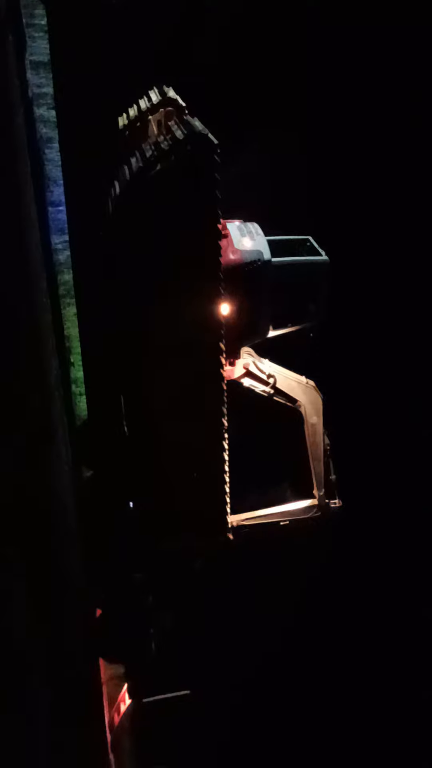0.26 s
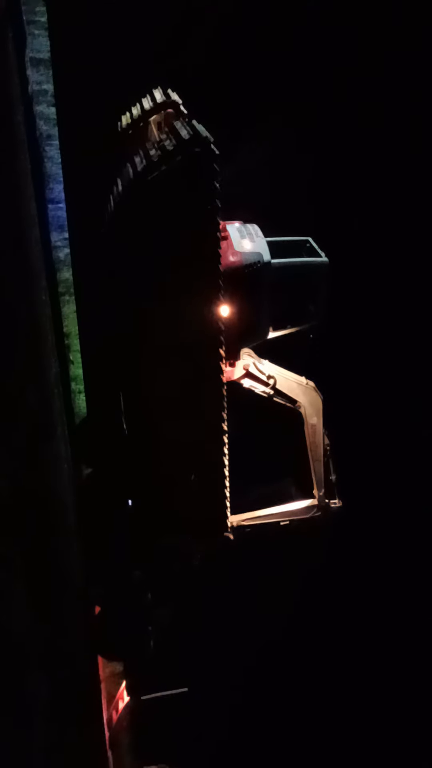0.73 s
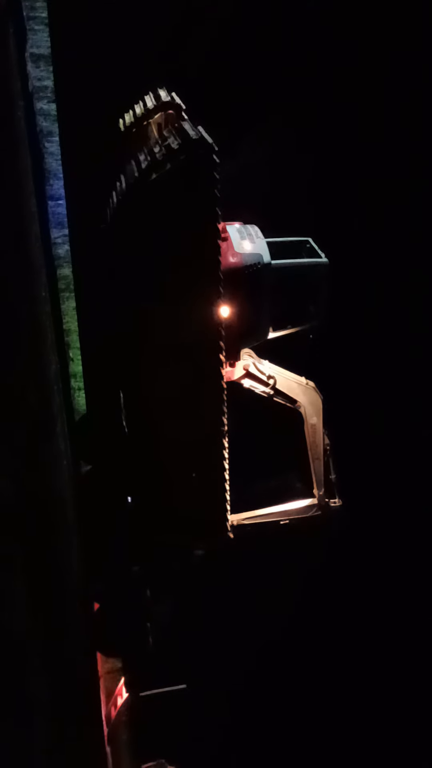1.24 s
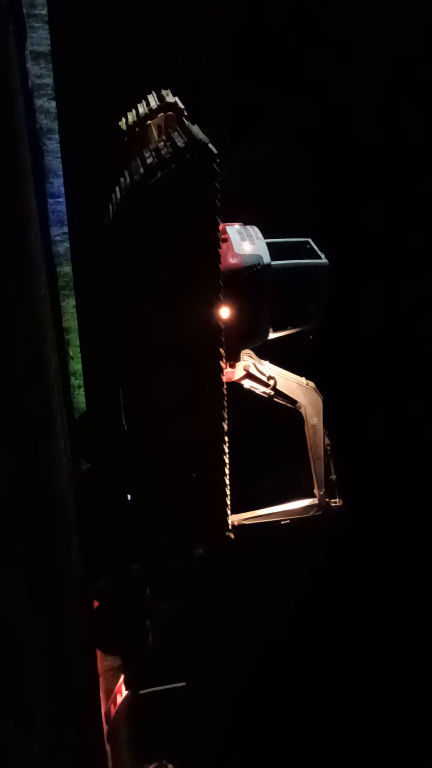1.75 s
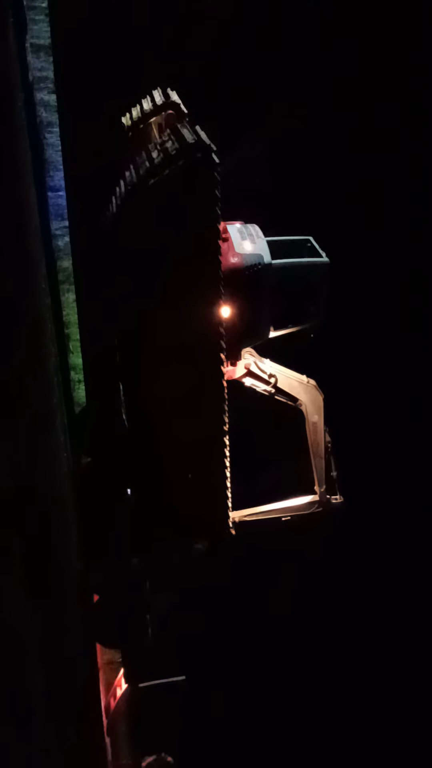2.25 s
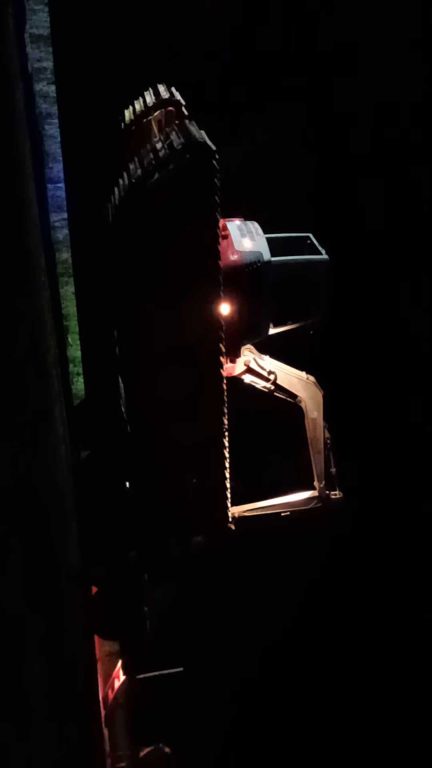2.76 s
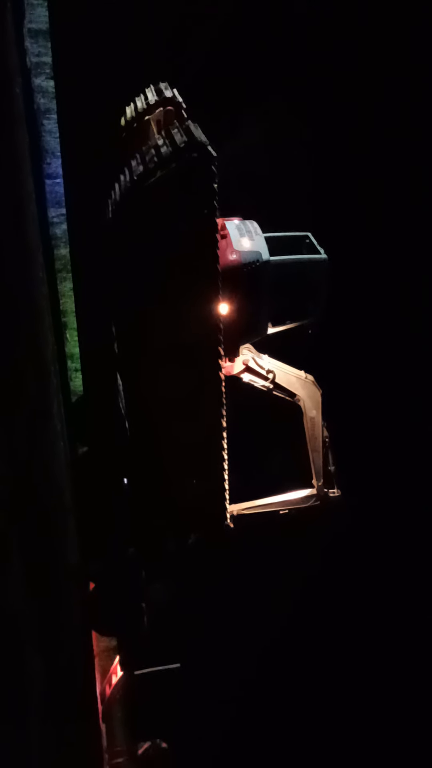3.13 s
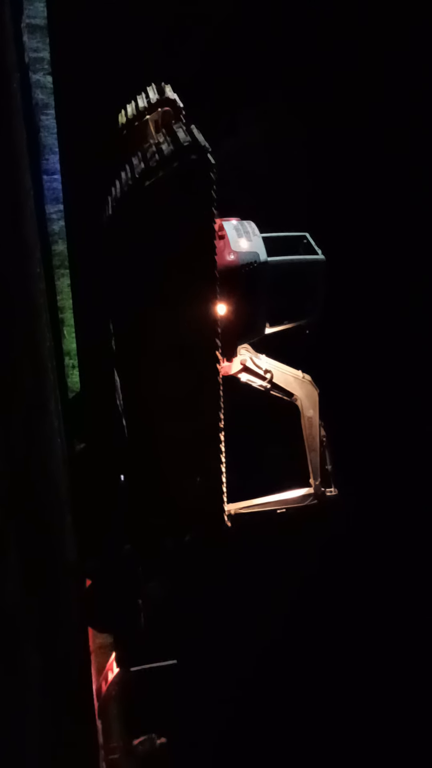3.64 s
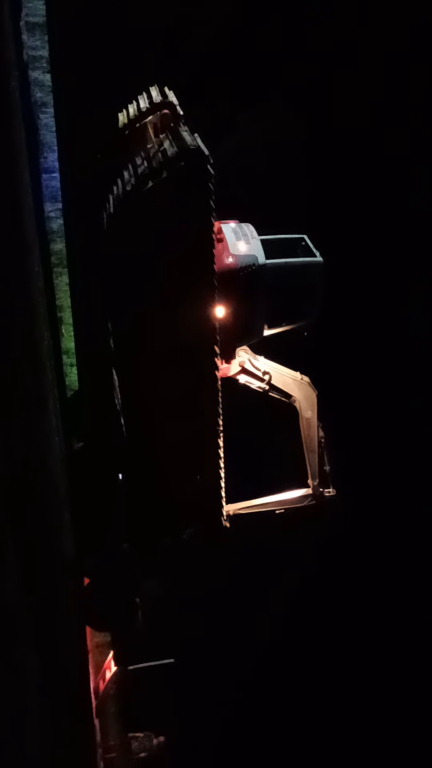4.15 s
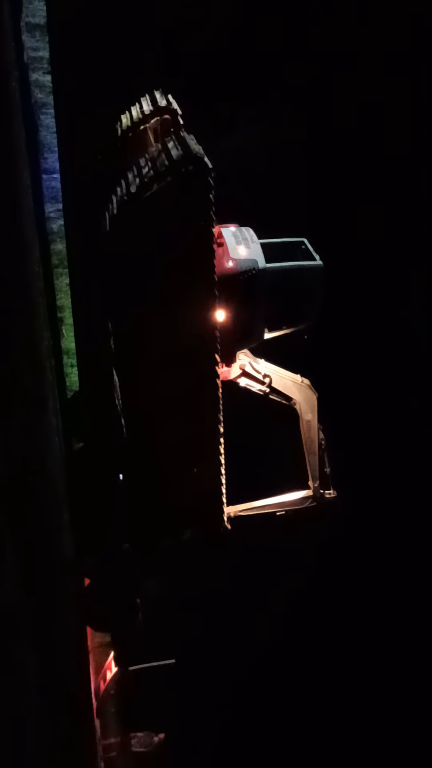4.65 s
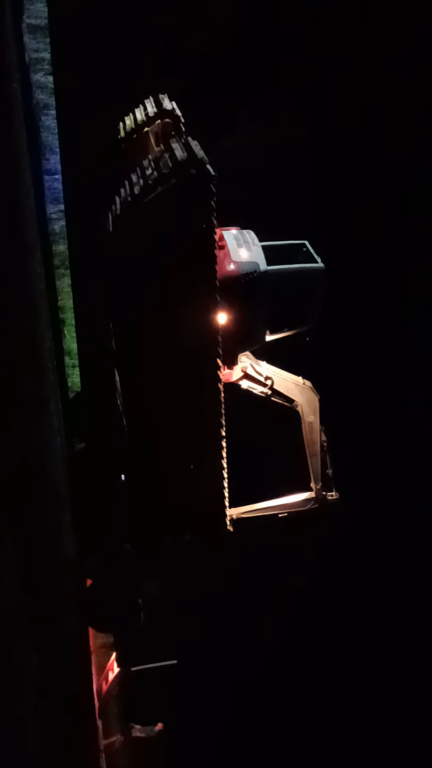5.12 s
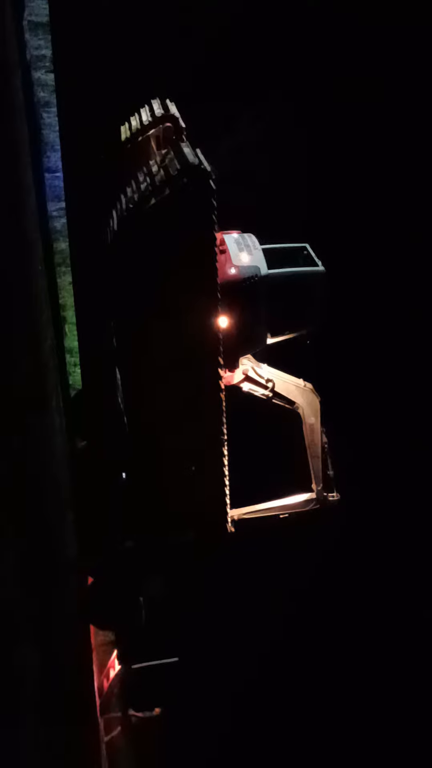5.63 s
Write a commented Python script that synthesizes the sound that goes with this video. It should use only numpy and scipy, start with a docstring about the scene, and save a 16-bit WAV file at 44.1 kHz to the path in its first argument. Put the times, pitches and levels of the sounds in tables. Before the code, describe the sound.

A heavy excavator diesel idles outdoors at an unchanging speed throughout: a low, buzzing exhaust drone, thick rumble and fast, dry injector clatter over an even fan rush, stronger on the left. Very close to the stereo microphone, loose steel bodywork knocks. At about 0.06 s a tiny metallic chirp comes with a booming knock, then lighter taps at 0.1 and 0.2 s. At 1.25 s a knock leads into a short, raspy, high squeal lasting under a fifth of a second, with a clank at 1.4 s. The loudest cluster bangs from 1.7 to 1.85 s, with tinny buzzing and hollow booms, and low panels shudder afterwards. A hard clank comes at 2.5 s. Faint soft hisses puff near 2.2, 3.0, 3.8 and 4.7 s. Knocks return at 4.95 and 5.03 s, then 5.54 s. Dull short echoes follow the blows; the level ducks after the heaviest and slowly recovers.

```python
"""Outdoors, beside steel bodywork, with an excavator's diesel idling.
The exhaust is a stack of tones locked to the crank; rumble and injection clatter are pulsed noise.
Close by, loose metal knocks, booms, chirps, buzzes and squeals once, over faint puffs of hiss: noise
bursts drive resonances, and echoes follow. The microphone's gain control ducks everything after the
loudest blows."""
import sys
import numpy as np
from scipy import signal
from scipy.fft import rfft, irfft, next_fast_len
from scipy.io import wavfile
from scipy.ndimage import uniform_filter1d, minimum_filter1d

SR = 44100
rng = np.random.default_rng(int(sys.argv[2]) if len(sys.argv) > 2 else 0)


def store_wav(level_fs):
    """Save 16-bit WAV to argv[1]."""
    pcm = np.round(np.clip(np.atleast_2d(level_fs), -1, 1) * 32767)
    wavfile.write(sys.argv[1], SR, pcm.T.astype(np.int16))


N = 259740
TIME = np.arange(N) / SR


def from_db(db):
    """Decibels to gain."""
    return 10 ** (np.asarray(db) / 20)


def rms_one(x):
    """Scale to unit power."""
    return x / np.sqrt(np.mean(x ** 2) + 1e-20)


def at_hz(points, hz):
    """Read a spectrum on a log-frequency axis."""
    f, value = np.transpose(points)
    return np.interp(np.log(np.maximum(hz, 1)), np.log(f), value)


def drift(rate):
    """Smooth chance with spread 1 that changes about rate times a second."""
    # drawn at a fortieth of the sample rate; the first 2000 values let the filter settle
    r = np.exp(-80 * np.pi * rate / SR)
    noise = rng.standard_normal(N // 40 + 2002)
    slow = signal.lfilter([1], [1, -2 * r, r * r], noise)[2000:]
    return np.interp(np.arange(N) / 40, np.arange(len(slow)), rms_one(slow))


def colour(x, spectrum, tilt_db=0):
    """Causal (minimum-phase) filter with the given spectrum; white noise keeps its power."""
    size = 2 * next_fast_len(x.shape[-1] // 2 + 2048)
    hz = np.fft.rfftfreq(size, 1 / SR)
    gain = from_db(at_hz(spectrum, hz) + tilt_db * np.log2(hz + 1))
    gain = rms_one(gain / (1 + (hz / (2 * spectrum[-1][0])) ** 2))
    # folding the cepstrum forward in time gives the minimum phase
    cepstrum = irfft(np.log(gain))
    cepstrum[1:size // 2] *= 2
    cepstrum[size // 2 + 1:] = 0
    return irfft(rfft(x, size) * np.exp(rfft(cepstrum)))[..., :x.shape[-1]]


def resonate(x, hz, width_hz):
    """A resonance that keeps the power of white noise."""
    r = np.exp(-np.pi * width_hz / SR)
    zeros = np.sqrt((1 - r * r) / 2) * np.array([1, 0, -1])
    poles = [1, -2 * r * np.cos(2 * np.pi * hz / SR), r * r]
    return signal.lfilter(zeros, poles, x + 1e-18)


def swell(t, hold, t60, rise=0.00037):
    """Quick rise, a hold, then an exponential decay."""
    return (1 - np.exp(-np.maximum(t, 0) / rise)) * from_db(-60 * np.maximum(t - hold, 0) / t60)


def strokes(phase, sharpness):
    """One burst a cycle, falling exponentially until the next; unit power."""
    return rms_one(np.exp(-sharpness * (phase % 1)))


def add(out, s, sound):
    """Mix a sound in at its time."""
    at = round(max(s, 0) * SR)
    out[..., at:at + sound.shape[-1]] += sound[..., :N - at]


def stereo(pair, likeness, balance):
    """Mix two unrelated signals to left and right; the phone's body shades the right port."""
    size = next_fast_len(N, True)
    hz = np.fft.rfftfreq(size, 1 / SR)
    mid, side = rfft(pair, size)
    alike = np.clip(at_hz(likeness, hz), -1, 1)
    sign = np.array([[1], [-1]])
    ports = from_db(sign * at_hz(balance, hz) / 2)
    ports /= np.sqrt(np.mean(ports ** 2, axis=0))
    mixed = np.sqrt((1 + alike) / 2) * mid + sign * np.sqrt((1 - alike) / 2) * side
    return irfft(ports * mixed, size)[:, :N]


# The crankshaft at idle. Each row: time in seconds, speed in turns per second.
CRANK_SPEED = [(0, 36.9), (1.2, 36.85), (2.1, 36.85), (2.8, 37.0), (5.5, 37.0), (5.89, 36.8)]
# The exhaust note. Each row: multiple of the crank rate, level in dB.
EXHAUST_ORDERS = [(2, -28.5), (4, -25), (5, -29.5), (6, -29.5), (9, -43.5), (10, -39.5), (12, -57),
                  (15, -46), (17, -54.5), (20, -52)]
# Colours of the low rumble and of the clatter. Each row: frequency in Hz, relative level in dB per Hz.
RUMBLE_COLOUR = [(20, -16), (40, -15), (60, -2), (85, -7), (103, 2), (122, 5), (190, 4.5), (260, 1.5),
                 (345, 2), (410, -10.5), (520, -18.5), (800, -32.5)]
CLATTER_COLOUR = [(380, -7.5), (500, -2), (680, -5), (1100, -9.5), (1290, -6.5), (1460, -9), (1820, -4.5),
                  (2200, -14.5), (2900, -21.5), (3150, -27), (5400, -34.5), (6600, -47.5), (9800, -26.5),
                  (13100, -42.5), (14600, -40)]
# How alike the engine is at the two ports. Each row: frequency in Hz, likeness (held within -1 to 1).
ENGINE_LIKENESS = [(60, 2.5), (150, 0), (300, 0.37), (600, -0.12), (14000, 0)]
# How far the engine leans to the left port. Each row: frequency in Hz, left minus right in dB.
ENGINE_BALANCE = [(60, 1), (150, 2), (300, 7.4), (600, 7), (1400, 10.6), (2600, 12.6), (5000, 9.4),
                  (6600, 10), (8000, 16), (10000, 67), (12500, 15), (15000, 10)]
# a tapping at its own steady rate; TAP_START is the part of a cycle already run at the start
TAPS_PER_S, TAP_START = 29.996, .12
# every second tap is weaker
TAP_ALTERNATION_DB = 1.5


def engine(waver=.1, start_turn=.55, throb=0.09, tap_sharpness=2.17):
    """Exhaust orders pile up once a turn; rumble swells with them and injection ticks three times."""
    turns = np.cumsum(np.interp(TIME, *np.transpose(CRANK_SPEED))) / SR + start_turn
    note = np.zeros(N)
    for order, db in EXHAUST_ORDERS:
        strength = np.sqrt(2) * from_db(db) * (1 + waver * drift(6.5))
        note -= strength * np.cos(2 * np.pi * order * turns + waver * drift(1.9))
    pulsed = rng.standard_normal((2, N)) * (1 + throb * np.cos(2 * np.pi * turns))
    rumble = from_db(-26.5) * colour(pulsed, RUMBLE_COLOUR)
    # injector ticks, whose strength wanders
    ticks = .36 * strokes(3 * turns, 3.0) * from_db(1.5 * drift(40))
    # a slower tapping lies beneath them
    beat = TAPS_PER_S * TIME + TAP_START
    tap_db = 1.26 * drift(50) - TAP_ALTERNATION_DB * (np.floor(beat) % 2)
    taps = 0.7 * strokes(beat, tap_sharpness) * from_db(tap_db)
    # the constant .5 is the even rush of the fan
    force = rms_one(np.sqrt(ticks ** 2 + taps ** 2 + .5))
    clatter = from_db(-31.5) * colour(rng.standard_normal((2, N)) * force, CLATTER_COLOUR)
    hissing = rumble + clatter + puffs()
    # the note is a little louder on the left
    return note * from_db([[.7], [-.7]]) + stereo(hissing, ENGINE_LIKENESS, ENGINE_BALANCE)


# A small steel part's modes. Each row: frequency in Hz, relative level in dB, 60 dB decay in seconds.
CHIRP_MODES = [(1934, -14.5, 0.065), (2002, -15.5, 0.042), (3080, -39, 0.06), (3967, -25, 0.033),
               (4290, -37, 0.073)]


def chirp(start=.058, hold=0.01):
    """A brief slip sets a small steel part ringing."""
    t = TIME - start
    return sum(from_db(db) * swell(t, hold, t60, rise=0.00082) * np.sin(2 * np.pi * hz * (t - hold))
               for hz, db, t60 in CHIRP_MODES)


def rattle(t, swing_hz, contacts_per_s=1100, smooth=0.28, slap=0.086):
    """Loose parts slap against a panel on every swing; unit power."""
    touching = rng.random((2, len(t))) < contacts_per_s / SR
    contacts = touching * rng.choice([-1, 1], (2, len(t)))
    grit = rms_one(contacts) + smooth * rng.standard_normal((2, len(t)))
    return rms_one(grit * strokes(swing_hz * t, slap))


# Colours of a blow's thud and clank. Each row: frequency in Hz, relative level in dB per Hz.
THUD_COLOUR = [(90, -33.5), (160, -0.5), (240, 4.5), (370, 2.5), (500, -3.5), (650, -17.5), (1200, -36)]
CLANK_COLOUR = [(300, -24.5), (600, 7.5), (880, 7.5), (1250, 3.5), (1850, 7.5), (2700, -2), (3150, -16),
                (3800, -10), (5000, -15.5), (6500, -30), (8000, -14.5), (10000, -4.5), (12900, -31),
                (14600, -14)]
# The steel frame's modes, which ring on. Each row: frequency in Hz, width in Hz, relative level in dB.
FRAME_MODES = [(316, 4.1, -3.5), (388, 1.4, 3), (453, 6, 7), (854, 14, -8), (1690, 16, -7), (1900, 17, -8),
               (2700, 25, -8), (3560, 53, -11), (3840, 33, -14), (4170, 90, -14), (5340, 18, -22),
               (8100, 90, -23)]
# the thud follows a blow's strength; the frame rings more, the harder the contact
THUD_DB, RING_DB, RING_PER_HARDNESS_OCTAVES = 5.5, -6, 2.03


def impact(hold, db, tilt_db, swing_hz, thud_t60=0.24, clank_t60=0.13, frame_t60=0.053):
    """A thud and a rattling clank; harder contacts reach the higher modes of the frame."""
    t = TIME[:SR // 2]
    grit = rattle(t, swing_hz)
    thump = rng.standard_normal((2, len(t))) * swell(t, hold, thud_t60)
    thud = from_db(THUD_DB) * colour(thump, THUD_COLOUR)
    clank = colour(grit * swell(t, hold, clank_t60), CLANK_COLOUR, tilt_db)
    drive = grit * swell(t, hold, frame_t60)
    ring = sum(from_db(level + tilt_db * np.log2(hz / 800)) * resonate(drive, hz, width)
               for hz, width, level in FRAME_MODES)
    return from_db(db) * (thud + clank + from_db(RING_DB + RING_PER_HARDNESS_OCTAVES * tilt_db) * ring)


# Blows on the bodywork, close by. Each row: start in seconds, rattling time in seconds, relative
# strength in dB, hardness in dB per octave, boom pitch in Hz, relative boom level in dB.
BLOWS = [ (0.059, 0.0015, -27, -2, 222, -2.5), (0.098, 0.015, -33.5, -8.5, 199.3, -26),
         (0.203, 0.0068, -26, -5.5, 352, -12), (1.251, 0.017, -27, -3.5, 180.6, -15.5),
         (1.385, 0.035, -21, -0.5, 165.5, -6.5), (1.715, 0.008, -17.5, 0, 194.6, -7.5),
         (1.755, 0.03, -27.5, -3, 252.6, -7.5), (1.808, 0.025, -29, 0, 178.3, -12),
         (1.845, 0.016, -17, -1, 202.4, -2.5), (2.504, 0.031, -23.5, 2, 219.3, -7),
         (4.955, 0.012, -19, -3, 274, -13), (5.025, 0.009, -26.5, -6.5, 182, -18),
         (5.543, 0.0049, -26, -4, 250, -19)]
# every blow bounces back once, weaker and duller
REBOUND_S, REBOUND_LOSS_DB, REBOUND_DULLING_DB_PER_OCTAVE = .043, 7, 6.5
# a slack, low panel booms longer than a taut one: t60 falls as a power of the pitch
BOOM_T60_S, BOOM_AT_HZ, BOOM_T60_POWER = 0.11, 207, 5.9


def bodywork():
    """Each blow strikes the steel, makes a panel boom and bounces back."""
    out, t = np.zeros((2, N)), TIME[:SR // 2]
    for s, hold, db, tilt_db, boom_hz, boom_db in BLOWS:
        add(out, s, impact(hold, db, tilt_db, boom_hz))
        dulled_db = tilt_db - REBOUND_DULLING_DB_PER_OCTAVE
        add(out, s + REBOUND_S, impact(hold, db - REBOUND_LOSS_DB, dulled_db, boom_hz))
        t60 = BOOM_T60_S * (BOOM_AT_HZ / boom_hz) ** BOOM_T60_POWER
        boom = -from_db(boom_db) * swell(t, hold, t60, rise=0.002) * np.sin(2 * np.pi * boom_hz * t)
        add(out[0], s, boom)
    return out


# Colour of the large panels' shudder. Each row: frequency in Hz, relative level in dB per Hz.
SHUDDER_COLOUR = [(20, -34), (40, -4), (60, -2.5), (95, -21), (125, -1.5), (180, 3), (300, -13.5),
                  (450, -26)]
# the booms feed a shudder of the large panels, which builds up and dies slowly
SHUDDER_DB, SHUDDER_RISE_S, SHUDDER_T60_S = -3.5, 0.054, 2.6
# the largest panel also hums, beating against the exhaust
PANEL_HZ, PANEL_DB = 62.3, -6


def shudder():
    """Large panels store the energy of every boom and keep rumbling and humming for a while."""
    energy = np.zeros(N)
    for s, hold, *_, boom_db in BLOWS:
        stored = from_db(boom_db) * swell(TIME - s, 0, SHUDDER_T60_S, rise=SHUDDER_RISE_S)
        energy += hold * stored ** 2
    panels = colour(rng.standard_normal((2, N)), SHUDDER_COLOUR)
    panels[0] += from_db(PANEL_DB) * np.sin(2 * np.pi * PANEL_HZ * TIME)
    return from_db(SHUDDER_DB) * np.sqrt(energy) * panels


def echoes(x, t60, wall_cut_hz=1500):
    """Dull, diffuse reflections from the surrounding steel, different at each port."""
    t = TIME[:SR // 2]
    tail = rng.standard_normal((2, len(t))) * swell(t, 0, t60, rise=0.013)
    tail /= np.sqrt(np.sum(tail ** 2) / 2)
    tail = signal.sosfilt(signal.butter(1, wall_cut_hz, fs=SR, output="sos"), tail)
    return signal.fftconvolve(x, tail, axes=1)[:, :N]


# Scrapes on a loose tin panel. Each row: start in seconds, length in seconds, relative level in dB.
SCRAPES = [(1.249, .025, -30.5), (1.382, 0.041, -20.5), (1.713, 0.02, -17.5), (1.761, 0.013, -23),
           (1.808, 0.054, -19.5)]
# The tin panel's modes. Each row: frequency in Hz, width in Hz, relative level in dB.
TIN_MODES = [(2570, 65, -7), (2685, 41, -4), (2697, 48, -11), (4650, 270, -12)]


def tin(t60=0.08, swing_hz=200):
    """Each scrape sets the loose tin panel buzzing."""
    drive, t = np.zeros((2, N)), TIME[:SR // 2]
    for s, hold, db in SCRAPES:
        add(drive, s, from_db(db) * rattle(t, swing_hz) * swell(t, hold, t60))
    buzz = sum(from_db(db) * resonate(drive, hz, width) for hz, width, db in TIN_MODES)
    return signal.sosfilt(signal.butter(2, [2200, 5200], "band", fs=SR, output="sos"), buzz)


# Partials of the squeal. Each row: multiple of the squeal's pitch, relative level in dB.
SQUEAL_PARTIALS = [(1, -1), (1.14, -12), (1.84, -15), (1.98, 4), (2.38, -13), (2.9, -13), (3, -12),
                   (3.96, -12.5), (5, -20), (6, -33), (7, -31), (8, -27.5), (9, -17), (10, -21.5),
                   (11, -34), (12, -35), (13, -39)]
# a dry joint squeals once: it catches, holds and lets go
SQUEAL_START_S, SQUEAL_ATTACK_S, SQUEAL_HOLD_S, SQUEAL_T60_S, SQUEAL_DB = 1.258, 0.029, 0.073, 0.073, -17
# its pitch and brightness sag as the pressure eases
SQUEAL_HZ, SQUEAL_SAG_HZ = 1014.4, 25
SQUEAL_BRIGHT_DB_PER_OCTAVE, SQUEAL_DULLING_DB_PER_OCTAVE = 4, 3.5


def squeal(flutter_db=4.5, rasp=0.18, scratch_db=-19):
    """Steel sticks and slips a thousand times a second, with a rasp, and dulls as the pressure eases."""
    t, length = TIME - SQUEAL_START_S, SQUEAL_ATTACK_S + SQUEAL_HOLD_S
    on = (t > 0) & (t < length + SQUEAL_T60_S)
    t = t[on]
    eased = np.minimum(t / length, 1) ** 3
    pitch_hz = (SQUEAL_HZ - SQUEAL_SAG_HZ * eased) * (1 + .006 * drift(400)[on])
    cycles = np.cumsum(pitch_hz) / SR
    tilt_db = SQUEAL_BRIGHT_DB_PER_OCTAVE - SQUEAL_DULLING_DB_PER_OCTAVE * eased
    tone = np.zeros(len(t))
    for k, level in SQUEAL_PARTIALS:
        partial_db = level + tilt_db * np.log2(k / 2) + flutter_db * drift(68)[on]
        tone += from_db(partial_db) * np.sin(2 * np.pi * k * cycles)
    grip = np.minimum(t / SQUEAL_ATTACK_S, 1) ** 2 * swell(t, length, SQUEAL_T60_S)
    scratch = from_db(scratch_db) * colour(rng.standard_normal(len(t)), CLANK_COLOUR)
    out = np.zeros(N)
    out[on] = from_db(SQUEAL_DB) * grip * (tone * (1 + rasp * drift(350)[on]) + scratch)
    return out


# Faint puffs of hiss. Each row: middle of the puff in seconds, level in dB.
PUFFS = [(2.221, -38.5), (2.96, -43.5), (3.831, -40), (4.701, -39.5)]
# Their colour. Each row: frequency in Hz, relative level in dB per Hz.
PUFF_COLOUR = [(2500, -21), (4500, -5), (6600, -22), (9800, 6), (12500, -13), (15000, 5)]


def puffs(width_s=0.02):
    """Soft hisses, a little less than a second apart, are coloured noise under bell-shaped swells."""
    level = sum(from_db(db) * np.exp(-((TIME - s) / width_s) ** 2 / 2) for s, db in PUFFS)
    return level * colour(rng.standard_normal((2, N)), PUFF_COLOUR)


# How alike the close metal is at the two ports. Each row: frequency in Hz, likeness (1 is identical).
BODY_LIKENESS = [(60, 1), (230, 0.87), (900, 0.66), (3500, 0.37), (13600, 0.13)]
# How far the close metal leans to the left port. Each row: frequency in Hz, left minus right in dB.
BODY_BALANCE = [(200, 1.1), (600, 5), (1400, 8.5), (2700, 7.8), (5000, 10), (7000, 7.5), (10000, 39),
                (13000, 12)]


def scene():
    """The engine, and the metal close by with its reflections; the small chirping part stays dry."""
    # row 0 of the metal is what the two ports share, row 1 what sets them apart
    metal = bodywork() + tin() + shudder()
    metal[0] += squeal()
    metal = metal + from_db(-7.5) * echoes(metal, t60=0.57)
    metal[0] += chirp()
    return engine() + from_db(3.0) * stereo(metal, BODY_LIKENESS, BODY_BALANCE)


# the gain control lets its measure of excess level fall this fast
EXCESS_FALL_DB_PER_S = 4
CUTOFF_HZ = 14100


def record(dry, threshold_db=-8.5, ratio=0.49, low_cut_hz=34):
    """Gain control ducks at once and recovers slowly; a fast limiter holds the peaks; both ends are cut."""
    x = signal.sosfilt(signal.butter(2, low_cut_hz, "high", fs=SR, output="sos"), dry)
    power = uniform_filter1d(np.mean(x ** 2, axis=0), size=882)
    level_db = 10 * np.log10(power + 1e-9)
    # the running maximum holds each peak of excess, less the fall since then
    fall = EXCESS_FALL_DB_PER_S * TIME
    over_db = np.maximum.accumulate(np.maximum(level_db - threshold_db, 0) + fall) - fall
    x = x * from_db(-ratio * uniform_filter1d(over_db, size=220))
    headroom = .82 / np.maximum(np.abs(x).max(axis=0), .82)
    x = x * uniform_filter1d(minimum_filter1d(headroom, size=61), size=61)
    return signal.sosfilt(signal.ellip(10, .3, 80, CUTOFF_HZ, fs=SR, output="sos"), x)


dry = scene()
out = record(dry)
store_wav(out)
```